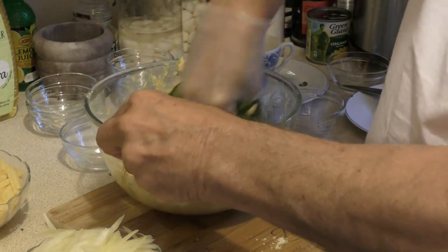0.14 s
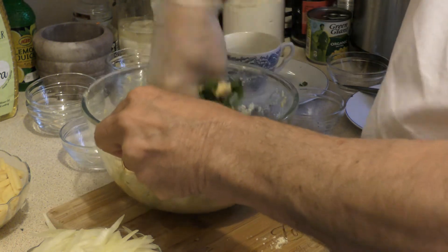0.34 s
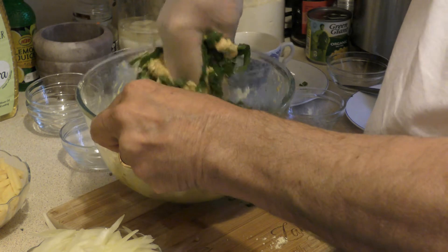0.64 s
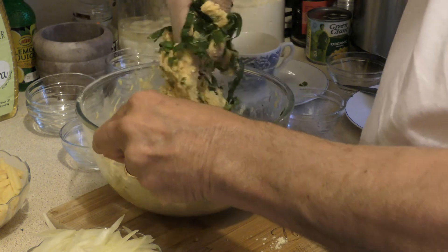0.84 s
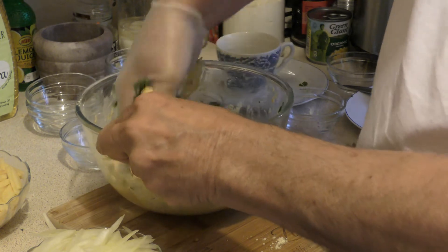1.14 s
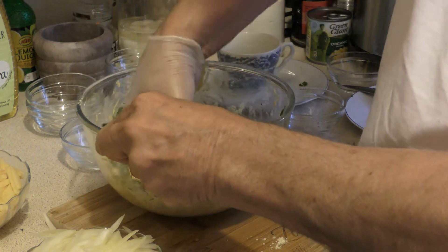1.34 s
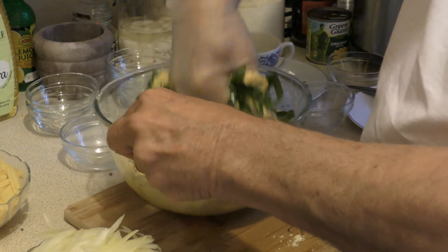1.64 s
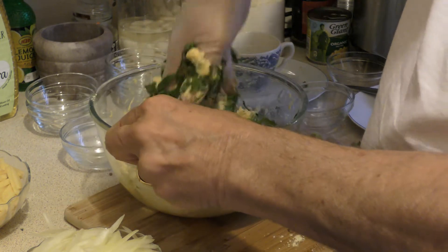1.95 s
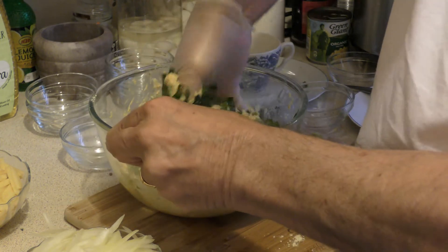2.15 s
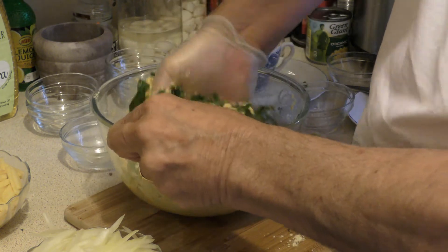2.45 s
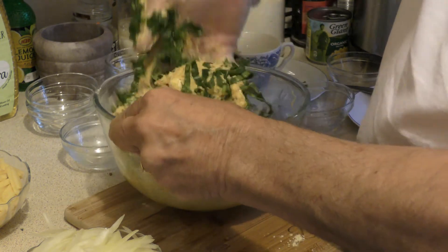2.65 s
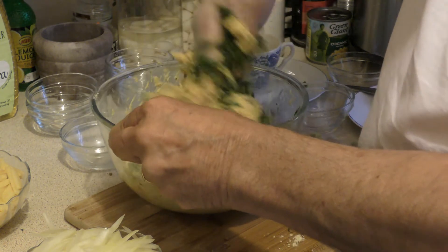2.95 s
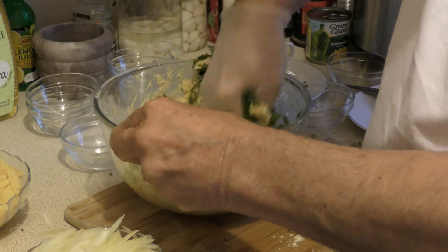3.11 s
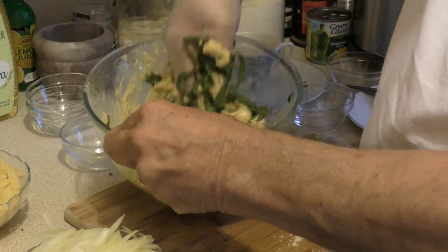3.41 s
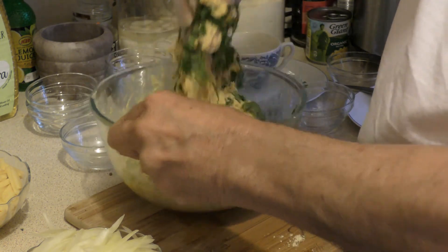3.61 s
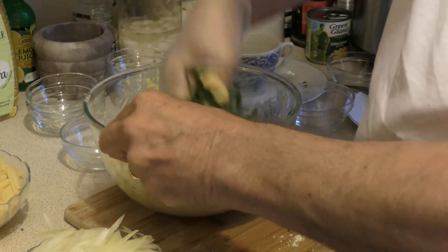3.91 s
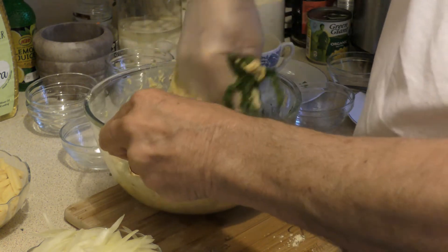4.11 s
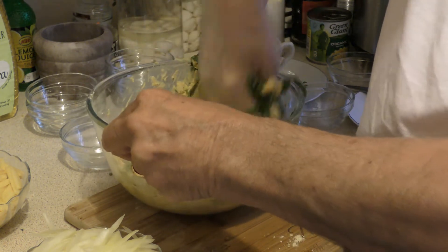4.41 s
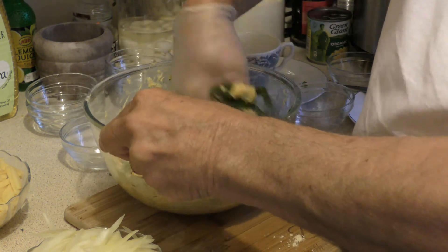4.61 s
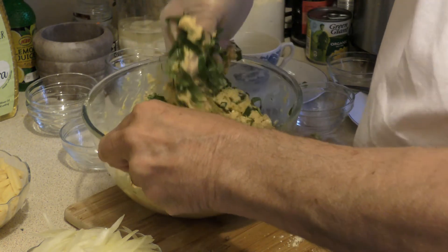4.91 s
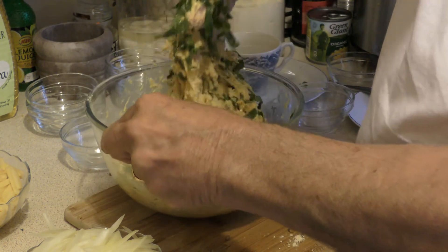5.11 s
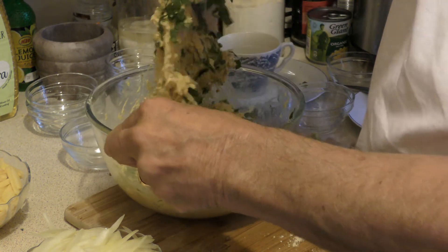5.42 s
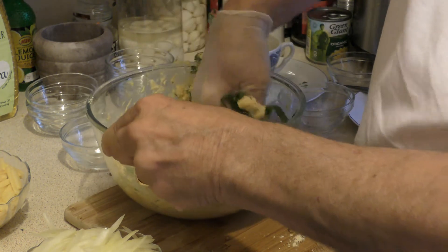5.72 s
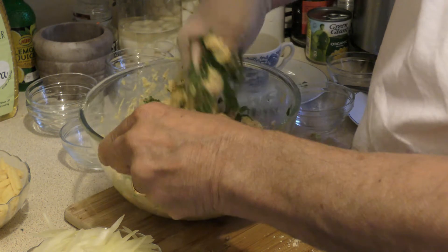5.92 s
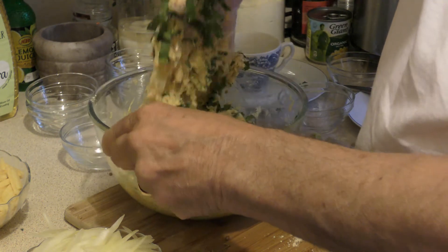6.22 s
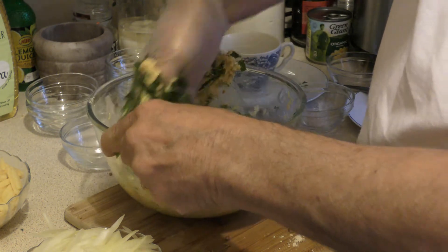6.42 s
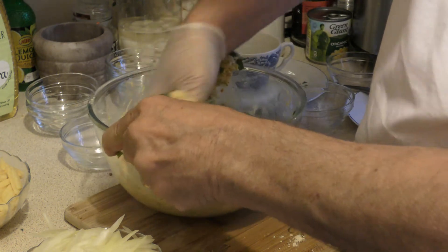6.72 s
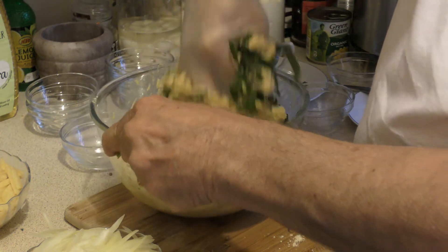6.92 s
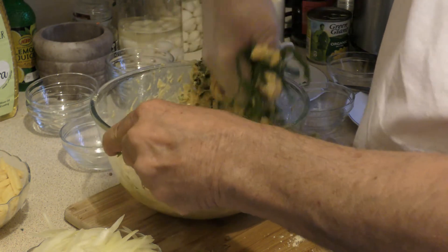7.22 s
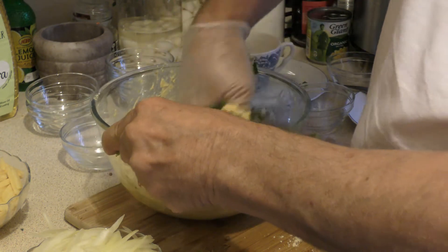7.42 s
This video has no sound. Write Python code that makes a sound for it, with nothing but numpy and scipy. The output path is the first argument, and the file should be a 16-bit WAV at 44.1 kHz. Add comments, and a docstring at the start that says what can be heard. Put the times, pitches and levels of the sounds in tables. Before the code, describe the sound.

Glass bowl on a wooden board, heard close up in stereo with a short room reverberation. Loud, dry knocks land at uneven intervals, the hardest slightly overloading the microphone. An early clear glass clink rings briefly and is smothered. Between them are quiet glove rubs, small moist smacks, short scrapes, soft taps and one tiny squeak near the end, with low steady hiss beneath.

```python
"""Small kitchen: a gloved hand squeezes and turns leafy batter in a glass bowl, over a faint steady hiss.
Rubbing, wet crackle and smacks are filtered showers of tiny random clicks.
Now and then the bowl tips on its wooden board: grinding slips and landings drive bowl and board modes.
Once the glass is struck: a snap and a knock set off decaying sine modes of the rim.
Drifting echo patterns, left-right colour and a softly overloading microphone finish the sound."""
import sys
import numpy as np
from scipy import signal
from scipy.fft import rfft, irfft, next_fast_len
from scipy.io import wavfile
from scipy.ndimage import uniform_filter1d

SR = 44100
rng = np.random.default_rng(int(sys.argv[2]) if len(sys.argv) > 2 else 0)


def pcm_store(signal):
    """Save signal as 16-bit PCM."""
    levels = np.round(np.clip(np.atleast_2d(signal), -1, 1) * 32767)
    wavfile.write(sys.argv[1], SR, levels.astype(np.int16).T)


N = 332954
TIME, BINS = np.arange(N) / SR, np.fft.rfftfreq(8192, 1 / SR)
CLINK_S = 1.6041

# bowl dropping back, soft touch then hard seat: [seat t/s, level/dB, hardness/Hz, board re bowl/dB,
# favoured f/Hz, snap level/dB, touch lead/s, touch level/dB]
LANDINGS = [(.7974, -5, 3700, -9, 1020, -1, .0018, -16), (2.8486, -8.3, 1950, -7, 191, -33, 0.0045, -20),
            (3.6526, -4, 2950, -7, 523, -11, .0012, -24), (4.2921, -20.5, 1900, -3, 1420, -45, 0.0073, -40),
            (5.0817, -6.3, 2550, -2, 1270, -20.5, .0053, -17.5),
            (6.136, -9.3, 2700, -2.5, 272, -36, 0.0044, -34),
            (7.1392, -10, 1720, -1.5, 790, -28.5, .0042, -16)]
# stereo width of reflections and hiss: [f/Hz, relative side re mid/dB]
ROOM_WIDTH = [(60, -5.5), (250, -6), (700, -9), (2400, -6.5), (4400, -3.5), (8000, -25.5), (13000, -1.5)]


def amp(db):
    """Decibels to gain."""
    return 10 ** (np.asarray(db) / 20)


def unit(x):
    """Scales to rms 1."""
    return x / np.sqrt(np.mean(x ** 2) + 1e-20)


def read(points, hz):
    """Interpolates a table on a log-frequency axis."""
    f, value = np.transpose(points)
    return np.interp(np.log(hz + 1), np.log(f), value)


def add(mix, s, sound):
    """Mixes a sound in at time s, in place."""
    part = mix[max(round(s * SR), 0):][:len(sound)]
    part += sound[:len(part)]


def ring(gain):
    """Minimum-phase impulse response of peak 1, shaped by a gain over BINS."""
    log_gain = np.log(np.maximum(gain, 1e-5))
    circle = np.concatenate([log_gain, log_gain[-2:0:-1]])
    spectrum = np.exp(np.conj(signal.hilbert(circle)))
    response = np.fft.ifft(spectrum).real[:len(gain)]
    return response / abs(response).max()


def through(x, gain):
    """Passes x through a causal filter; the result has rms 1."""
    return unit(signal.fftconvolve(x, ring(gain))[:len(x)])


def grains(count, per_s, spread_db):
    """Random tiny clicks of either sign and uneven size, rms 1."""
    chance = rng.random(count)
    size = np.minimum(rng.exponential(1, count), 4)
    sign = rng.choice([-1, 1], count)
    return unit((chance < per_s / SR) * sign * amp(spread_db * size))


def hump(hz, octaves):
    """Bell-shaped gain around hz."""
    return 1 / (1 + (np.log2((BINS + 1) / hz) / octaves) ** 2)


def gesture(t, length, attack_s, release_s, change_db):
    """Attack, a hold that changes evenly in dB, and an exponential release."""
    attack = np.minimum(t / attack_s, 1)
    hold = amp(change_db * np.minimum(t / length, 1))
    return attack * hold * np.exp(-np.maximum(t - length, 0) / release_s)


def hiss(level_db=-60, wider_db=2):
    """Steady background hiss, wide in stereo: coloured noise, independent in mid and side."""
    # hiss spectrum: [f/Hz, relative level/dB]
    hiss_colour = [(20, -4), (60, 5), (300, 0), (600, -10), (1400, -5.5), (2400, -9.2), (3100, -8.2),
                   (4400, -19.5), (10000, -21.3), (16000, -25)]
    colour = amp(read(hiss_colour, BINS))
    side_colour = colour * amp(wider_db + read(ROOM_WIDTH, BINS))
    mid = through(rng.standard_normal(N), colour)
    side = through(rng.standard_normal(N), side_colour)
    side = side * np.linalg.norm(side_colour) / np.linalg.norm(colour)
    return amp(level_db) * np.array([mid + side, mid - side])


def room_tail(build_s=0.00048):
    """Dense stereo reflections, each band dying at its own speed."""
    # decay of the reverberation: [f/Hz, t60/s]
    room_t60 = [(100, 0.64), (300, 0.17), (700, 0.2944), (1400, 0.3115), (4000, 0.2778), (8000, 0.3438),
                (15000, 0.31)]
    # strength of the reverberation: [f/Hz, relative level/dB]
    room_colour = [(40, -15), (120, 3.5), (220, 3), (600, 1.5), (1300, -2.5), (3500, -1.5), (7000, -1),
                   (15000, -4)]
    count = SR // 2
    echoes = [grains(count, per_s=6000, spread_db=1) for _ in range(2)]
    hz, t, (mid, side) = signal.stft(echoes, SR, nperseg=512)
    side = side * amp(read(ROOM_WIDTH, hz))[:, None]
    fade_db = -60 * t / read(room_t60, hz)[:, None]
    band_gain = amp(fade_db + read(room_colour, hz)[:, None])
    tail = signal.istft(np.array([mid + side, mid - side]) * band_gain, SR)[1][:, :count]
    build = 1 - np.exp(-(np.arange(count) / SR / build_s) ** 2)
    return tail * build / np.sqrt(SR * 0.021)


def kitchen(x, patterns=3, patterns_per_s=1.1):
    """Reflections change as arm and bowl move: a cyclic crossfade between echo patterns."""
    out = np.zeros((2, N))
    for k in range(patterns):
        away = abs((TIME * patterns_per_s - k + patterns / 2) % patterns - patterns / 2)
        share = np.cos(np.pi / 2 * np.minimum(away, 1))
        out += signal.fftconvolve((x * share)[None], room_tail(), axes=1)[:, :N]
    return out


def placed(x, right_over_left):
    """Sets the left-right balance band by band."""
    size = next_fast_len(N + SR // 10)
    right_db = read(right_over_left, np.fft.rfftfreq(size, 1 / SR))
    return irfft(rfft(x, size) * amp([-right_db / 2, right_db / 2]), size)[:, :N]


def clink(level_db=-7.5, shimmer_db=-24, shimmer_t60_s=0.33):
    """The struck rim: decaying modes, some close enough to beat, over a shimmer of many weak ones."""
    # free rim modes: [f/Hz, relative level/dB, t60/s before smothering]
    rim = [(2286, -28, 0.39), (2389, -20, 0.32), (2325, -1.5, 0.027), (2920, -25.5, 0.3), (3600, -38, 0.5),
           (4830, -23, 0.5), (4870, -18.5, 0.32), (5670, -28, 0.15), (6000, -34.5, 0.32), (6562, -31, 0.16),
           (7319, -35, 0.24), (8350, -28.5, 0.36), (8320, -19, 0.072), (12230, -33, 0.16), (14090, -47, .2)]
    # crowd of weaker rim modes: [f/Hz, relative level/dB]
    shimmer_colour = [(1200, -22), (2300, -6), (4600, 0), (5300, -9), (7500, -5), (8300, -8), (9300, -19),
                      (15000, -36)]
    smother_s, smother_db_per_s = 1.76, 160  # falling batter smothers the rim
    out, t = np.zeros(N), np.arange(SR) / SR
    modes = sum(amp(db) * 1e-3 ** (t / t60) * np.sin(2 * np.pi * hz * t) for hz, db, t60 in rim)
    shimmer = through(rng.standard_normal(SR), amp(read(shimmer_colour, BINS)))
    shimmer = shimmer * 1e-3 ** (t / shimmer_t60_s)
    add(out, CLINK_S, amp(level_db) * (modes + amp(shimmer_db) * shimmer))
    return out * amp(-smother_db_per_s * np.maximum(TIME - smother_s, 0))


def body(hard_hz, board_db, spot=1):
    """Gain of bowl and board modes; a softer contact excites less treble."""
    # resonances of the board under the bowl: [f/Hz, width/Hz, relative level/dB]
    board = [(148, 60, -5.5), (203, 27, -2), (260, 40, 0), (359, 52, -0.5), (495, 87, -3)]
    # resonances of the bowl damped by batter: [f/Hz, width/Hz, relative level/dB]
    bowl = [(760, 240, -5.5), (1000, 102, -1.5), (1220, 130, -10), (1379, 114, 1), (1575, 173, -2),
            (1830, 74, -6.5), (2020, 165, -2.5), (2240, 25, -7.5), (2440, 110, -2.5), (2894, 120, -2),
            (3440, 360, -6.5), (4100, 480, -12), (4470, 760, -10.5), (6100, 1300, -10), (7600, 1700, -32)]

    def power(modes):
        return sum(amp(db) ** 2 / (1 + (2 * (BINS - hz) / width) ** 2) for hz, width, db in modes)

    resonance = power(bowl) + amp(board_db) ** 2 * power(board)
    return spot * np.sqrt(resonance / (1 + (BINS / hard_hz) ** 4.58))


def slides(slips_per_s=2200, spread_db=2.5, favour_db=5, octaves=0.14):
    """The tipped bowl grinds: quick slips of glass on wood drive bowl and board modes."""
    # grinding, each swelling or dying evenly: [start t/s, length/s, first relative level/dB,
    # last relative level/dB, hardness/Hz, board re bowl/dB, favoured f/Hz]
    grinds = [(0, .02, -30, -36, 1400, 0, 734), (.62, .165, -50, -37, 1600, -5, 1350),
              (.83, .29, -35.5, -54, 3000, -10, 2270), (1.526, .075, -36, -31.5, 4300, -8, 2300),
              (1.702, 0.053, -49, -49, 3000, 2, 2300), (3.695, .125, -34, -36, 2680, 0.5, 1640)]
    grip_s, stop_s = 0.008, 0.012
    out, t = np.zeros(N), np.arange(SR // 2) / SR
    for s, length, first_db, last_db, hard_hz, board_db, spot_hz in grinds:
        spot = amp(favour_db * hump(spot_hz, octaves))
        slips = grains(len(t), slips_per_s, spread_db)
        sound = through(slips, body(hard_hz, board_db, spot))
        swell = gesture(t, length, grip_s, stop_s, last_db - first_db)
        add(out, s, amp(first_db) * swell * sound)
    return out


def cracks(rattle_db=-2, rattle_s=0.0017, clink_snap_db=-5):
    """Very short wide-band snaps as the bowl seats or its rim is struck."""
    # snap spectrum: [f/Hz, relative level/dB]
    crack_colour = [(15, -1), (45, 14), (90, 9), (300, 8.5), (1000, 7.5), (3500, 10.5), (6500, -2.5),
                    (10000, 2), (16000, -17.5)]
    out, t = np.zeros(N), np.arange(len(BINS)) / SR
    snap = ring(amp(read(crack_colour, BINS)))
    for s, _, _, _, _, snap_db, _, _ in LANDINGS:
        rattle = grains(len(t), per_s=9000, spread_db=0) * np.exp(-t / rattle_s)
        rattle = signal.fftconvolve(snap, rattle / np.linalg.norm(rattle))
        add(out, s, amp(snap_db) * snap)
        # the rattle starts just ahead of the snap
        add(out, s - rattle_s, amp(snap_db + rattle_db) * rattle)
    add(out, CLINK_S, amp(clink_snap_db) * snap)
    return out


def contacts(rebound_s=0.0036, rebound_db=-9.5, nudge_board_db=1):
    """Blows on the bowl: (t/s, level/dB, hardness/Hz, board re bowl/dB, favoured f/Hz)."""
    # hand nudging the seated bowl against the board: [t/s, level/dB, hardness/Hz, favoured f/Hz]
    nudges = [(.195, -35.5, 2200, 1150), (.354, -44, 500, 330), (.394, -44, 500, 418),
              (0.678, -34, 1590, 394), (1.101, -36, 1500, 1140), (1.271, -41.5, 1210, 356),
              (1.523, -25.5, 1590, 1060), (1.793, -37.5, 900, 157), (2.547, -43, 700, 169),
              (3.201, -33, 1800, 396), (3.626, -28.5, 4000, 2000), (3.929, -28, 4000, 2340),
              (3.971, -30.5, 1570, 1180), (4.059, -39.5, 800, 790), (4.3013, -22, 2210, 353),
              (4.537, -38.5, 895, 350), (5.252, -37, 1300, 1130), (5.877, -25.5, 1350, 1420),
              (6.7913, -27, 1400, 1140), (6.9737, -26, 1460, 1410), (7.459, -38.5, 1100, 334)]
    for s, db, hard_hz, board_db, spot_hz, _, lead_s, touch_db in LANDINGS:
        yield s - lead_s, touch_db, 880, -1.5, 260  # soft touch of the foot
        yield s, db, hard_hz, board_db, spot_hz
        # the foot rebounds once
        yield s + rebound_s * rng.uniform(.7, 1.3), db + rebound_db, hard_hz, board_db, spot_hz
    yield CLINK_S, -17, 3500, -16, 2300  # knock that sets the rim ringing
    for s, db, hard_hz, spot_hz in nudges:
        yield s, db, hard_hz, nudge_board_db, spot_hz


def knocks(favour_db=6, octaves=0.16, chatter_db=-7, chatter_s=0.0039, splatter_db=-35,
           splatter_s=0.011):
    """Each blow chatters briefly and rings bowl and board; the landing spot favours one resonance."""
    # batter shaken by a knock: [f/Hz, relative level/dB]
    splatter_colour = [(800, -23), (2200, 0.5), (4200, -1.5), (6000, -11.5), (9000, -14), (15000, -30)]
    out, t = np.zeros(N), np.arange(len(BINS)) / SR
    for s, db, hard_hz, board_db, spot_hz in contacts():
        chatter = grains(len(t), per_s=4000, spread_db=1.0) * t * np.exp(-2 * t / chatter_s)
        chatter = chatter / np.linalg.norm(chatter)
        blow = ring(body(hard_hz, board_db, amp(favour_db * hump(spot_hz, octaves))))
        blow = blow + amp(chatter_db) * signal.fftconvolve(blow, chatter)[:len(t)]
        # the jolt makes the batter crackle
        clicks = grains(len(t), per_s=2700, spread_db=0.5)
        splatter = through(clicks, amp(read(splatter_colour, BINS))) * np.exp(-t / splatter_s)
        add(out, s, amp(db) * (blow + amp(splatter_db) * splatter))
    return out


def smacks(level_db=-1, top_hz=12500):
    """A pocket opens: a dying clump of wet clicks, narrow in pitch when air squeaks out of a gap."""
    # air pockets and leaves giving way: [t/s, relative level/dB, decay time/s, centre f/Hz]
    wet_pockets = [(.195, -51, 0.016, 1390), (.241, -45.5, 0.012, 4970), (.389, -47.5, 0.014, 7350),
                   (.605, -53.5, .0054, 4970), (.642, -52, .004, 8040), (1.101, -54.5, .006, 8000),
                   (1.247, -38.5, .006, 5200), (1.268, -47, .013, 1840), (1.949, -49, 0.025, 1900),
                   (2.598, -48, .0055, 8000), (2.618, -45.5, .005, 7000), (3.2, -44, 0.0087, 6500),
                   (3.599, -50, 0.011, 7500), (3.627, -44, 0.0081, 2600), (3.93, -52.5, .012, 6100),
                   (4.088, -52.5, 0.0098, 7500), (4.301, -39.5, .012, 6000), (4.92, -56, 0.024, 10000),
                   (6.215, -53, .005, 8000), (6.762, -53, 0.013, 8000), (7.035, -49.5, .013, 9300)]
    squeak = (7.039, -41, 0.007, 5760)  # same columns
    out, t = np.zeros(N), np.arange(SR // 8) / SR
    muffle = 1 / np.sqrt(1 + (BINS / top_hz) ** 8)
    for pockets, octaves in (wet_pockets, 0.91), ([squeak], 0.14):
        for s, db, decay_s, hz in pockets:
            clicks = grains(len(t), per_s=11000, spread_db=2.5)
            clump = through(clicks, hump(hz, octaves) * muffle)
            add(out, s, amp(db + level_db) * np.exp(-t / decay_s) * clump)
    return out


def kneading(rub_db=-3.5, wet_db=-5.5, uneven_db=1.77):
    """With each stroke the glove slips over smeared glass while tiny films of batter burst."""
    # squeezes and sweeps: [start t/s, length/s, rub relative level/dB, crackle relative level/dB]
    strokes = [(0, .1, -62, -62), (.14, .13, -58, -58), (.33, .12, -57.5, -56.5), (.61, 0.23, -54.5, -57.5),
               (1.082, 0.26, -60, -64), (1.5, 0.15, -54, -50), (1.737, 0.3, -57, -62.5),
               (2.068, .36, -55.5, -60.5), (2.463, .2, -56.5, -57.5), (2.712, 0.036, -55, -75),
               (3.029, 0.068, -54.5, -64), (3.143, 0.083, -49.5, -53.5), (3.316, 0.27, -61, -60),
               (3.92, 0.08, -58, -62), (4.098, 0.15, -57, -62), (4.443, 0.17, -58, -60),
               (4.711, 0.19, -54.5, -60), (5.024, 0.14, -61, -65), (5.643, 0.041, -52.5, -67),
               (5.836, 0.36, -60, -62.5), (6.355, 0.41, -63, -69), (6.734, 0.31, -59.5, -63),
               (7.204, 0.33, -58, -57)]
    # resting hand lifted clear of the bowl: [from t/s, to t/s]
    lifts = [(2.76, 3.02), (5.2, 5.83), (6.27, 6.35)]
    # glove on glass: [f/Hz, relative level/dB]
    rub_colour = [(40, -11.5), (130, 0), (300, -2), (600, -4.5), (1200, -1), (1900, 0.5), (3000, -4),
                  (4500, -12), (9000, -20.5)]
    # wet crackle: [f/Hz, relative level/dB]
    wet_colour = [(200, -25), (1500, -9), (3500, 1.5), (6000, -1.5), (9000, -1), (12000, -3), (16000, -16)]
    press_s, let_go_s, ease_db = 0.045, 0.046, -2
    idle_rub_db, idle_wet_db = -72, -70.5  # hand resting in the batter, before the trims
    t = np.arange(SR) / SR
    lifted = sum((TIME > up) & (TIME < down) for up, down in lifts)
    resting = uniform_filter1d(1. - lifted, size=1500)
    rubbing, crackle = resting * amp(idle_rub_db), resting * amp(idle_wet_db)
    for s, length, glove_db, crackle_db in strokes:
        pressure = gesture(t, length, press_s, let_go_s, ease_db)
        add(rubbing, s, amp(glove_db) * pressure)
        add(crackle, s, amp(crackle_db) * pressure)
    rub = through(grains(N, per_s=2500, spread_db=3), amp(read(rub_colour, BINS)))
    wet = through(grains(N, per_s=1300, spread_db=2.5), amp(read(wet_colour, BINS)))
    lumps = amp(uneven_db * unit(uniform_filter1d(rng.standard_normal(N), size=900)))
    return lumps * (amp(rub_db) * rubbing * rub + amp(wet_db) * crackle * wet)


def scene():
    """Mixes direct sound and reflections; snaps and glass are mostly direct, hiss comes on top."""
    # sound straight from the bowl: [f/Hz, right re left/dB]
    direct_side = [(60, -5), (170, -2), (300, 0.5), (550, 5.5), (1200, 4), (2500, 3.5), (6000, 1.5),
                   (14000, 5.5)]
    # the reflections: [f/Hz, right re left/dB]
    room_side = [(60, -3.5), (200, -1), (380, 0), (700, 2), (1300, -1), (2400, -4), (5000, -0.8),
                 (14000, -3.5)]
    grind, glass, snaps, blows = slides(), clink(), cracks(), knocks()
    batter = smacks() + kneading()
    direct = blows + snaps + amp(-6) * grind + amp(-3) * glass + batter
    sent = blows + amp(-18.5) * snaps + amp(-6) * grind + amp(-7) * glass + amp(-0.5) * batter
    return placed(direct, direct_side) + placed(kitchen(sent), room_side) + hiss()


def record(dry, edge_hz=15900, overload=0.92):
    """Microphone colour, a gentle overload on the hardest knocks, then the band limit."""
    # microphone response: [f/Hz, relative gain/dB]
    microphone = [(30, -2), (260, -0.5), (350, 5), (470, 1), (620, -2.5), (800, -2.5), (980, 2.5),
                  (1130, 8), (1300, 3.5), (16000, 5)]
    gain = amp(read(microphone, BINS))
    colour = ring(gain)
    colour *= gain.mean() / abs(rfft(colour)).mean()
    heard = signal.fftconvolve(dry, colour[None], axes=1)[:, :N]
    heard = heard / (1 + (heard / overload) ** 4) ** .25
    lowpass = signal.firwin(301, edge_hz, window=("kaiser", 8), fs=SR)
    return signal.oaconvolve(heard, lowpass[None], "same")


dry = scene()
out = record(dry)
pcm_store(out)
```